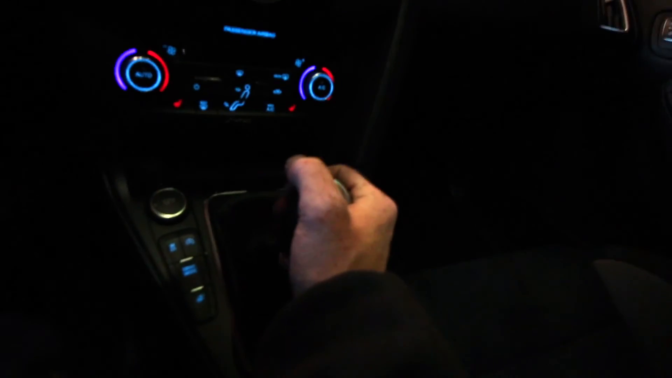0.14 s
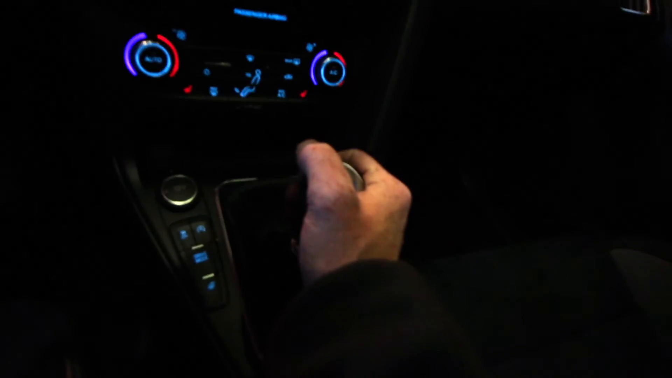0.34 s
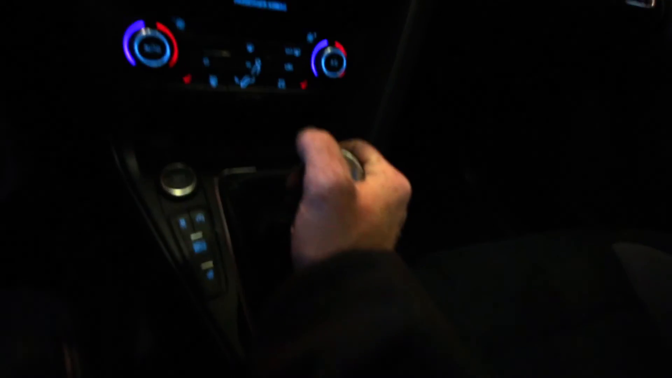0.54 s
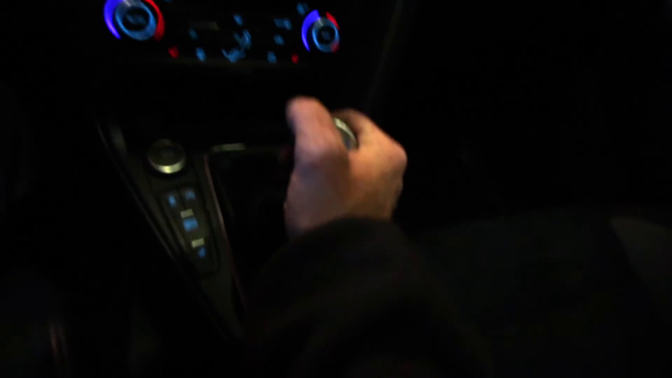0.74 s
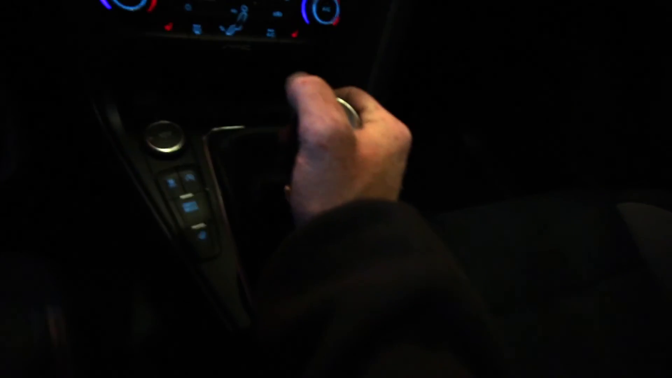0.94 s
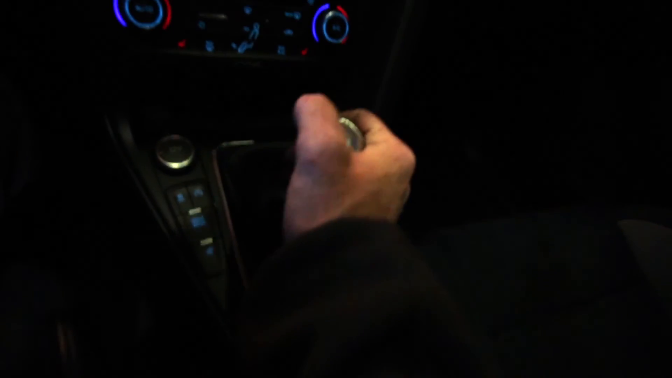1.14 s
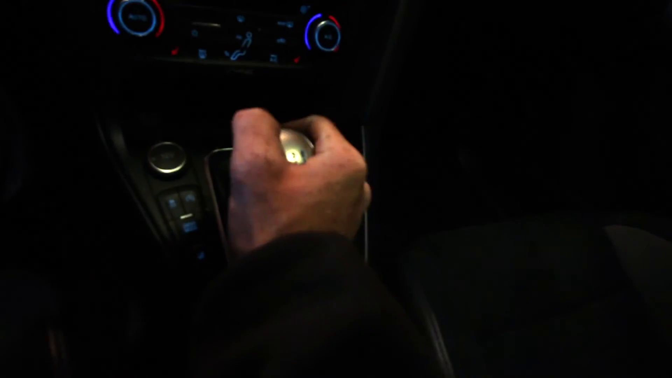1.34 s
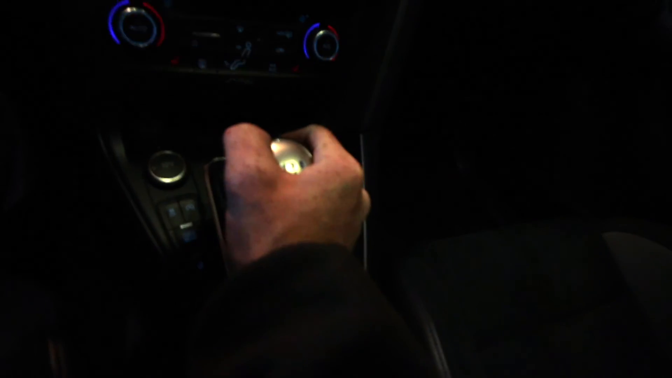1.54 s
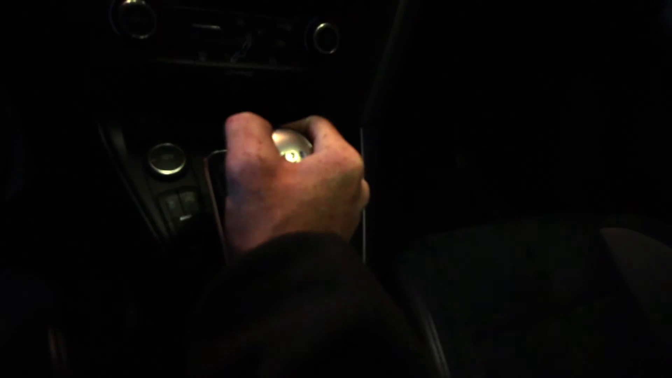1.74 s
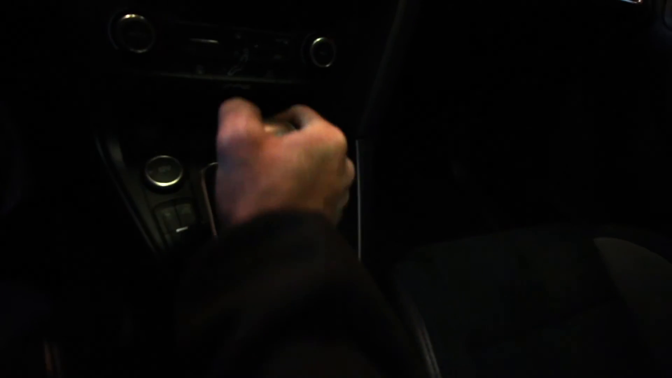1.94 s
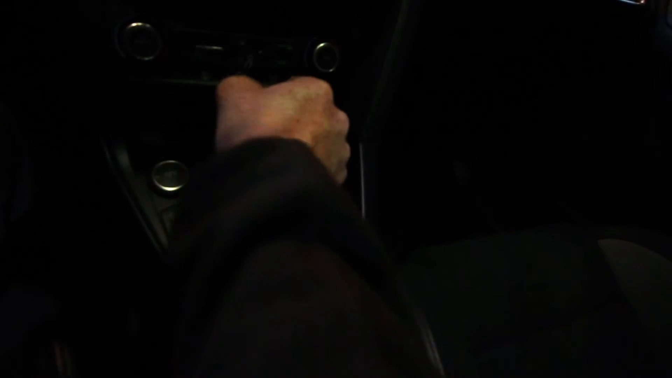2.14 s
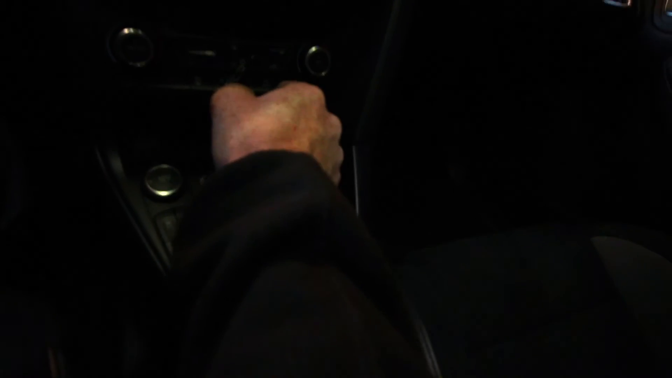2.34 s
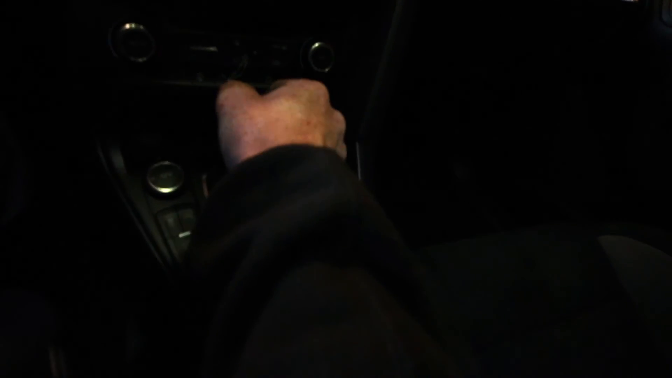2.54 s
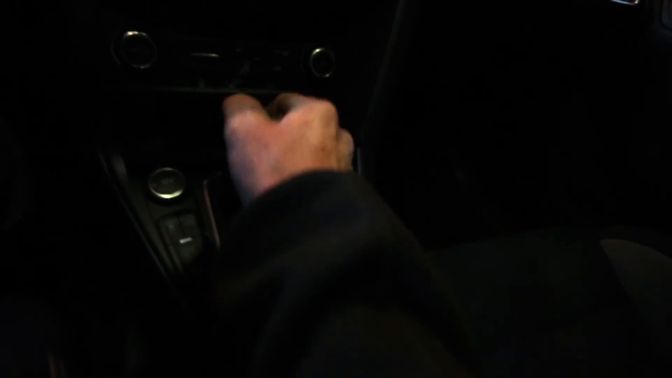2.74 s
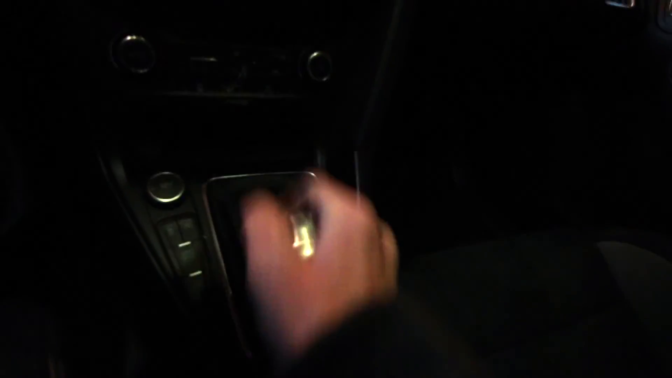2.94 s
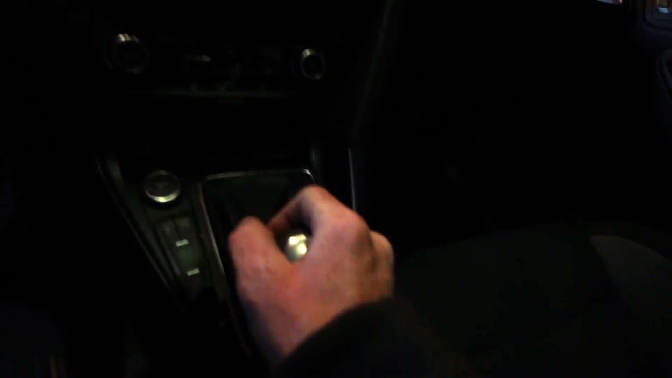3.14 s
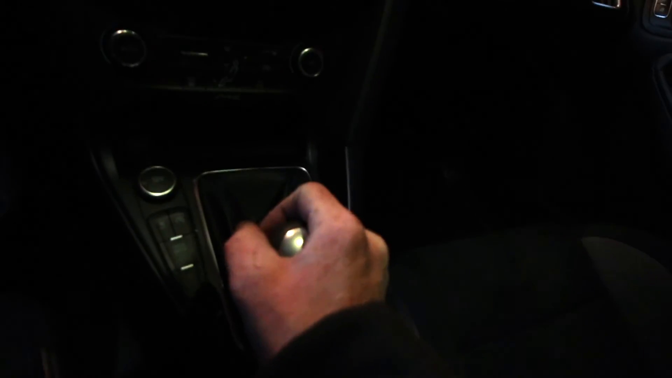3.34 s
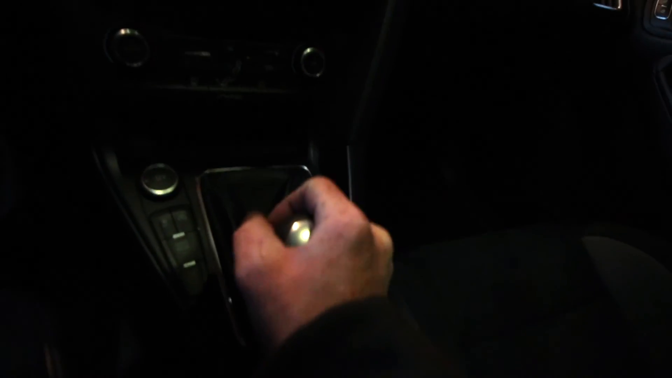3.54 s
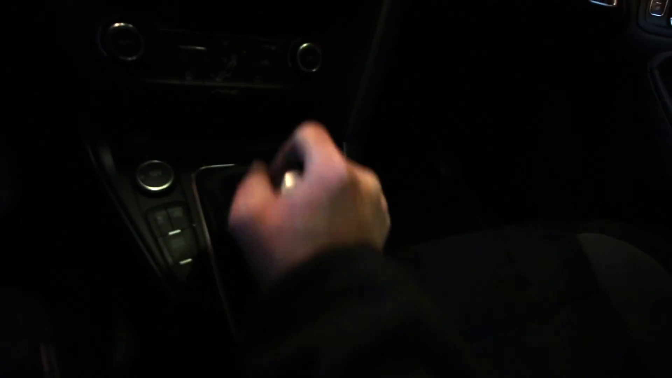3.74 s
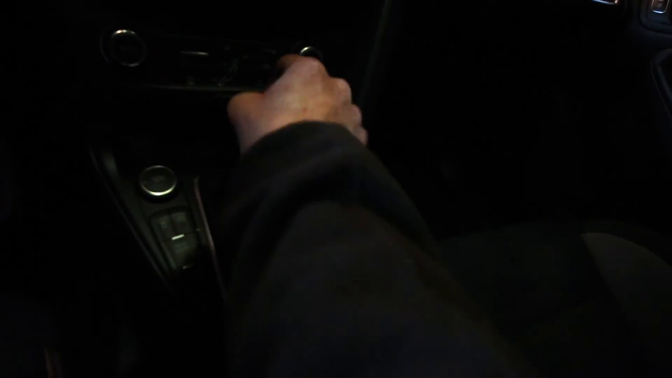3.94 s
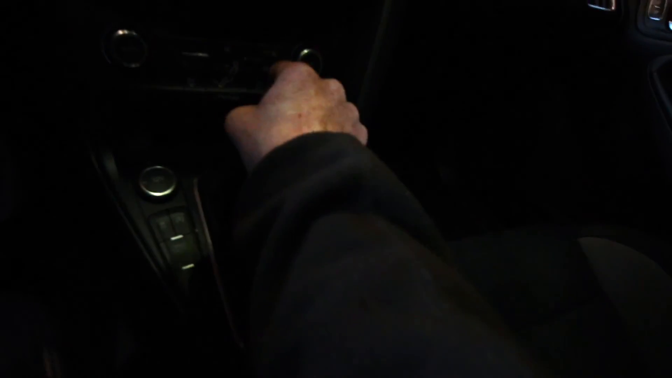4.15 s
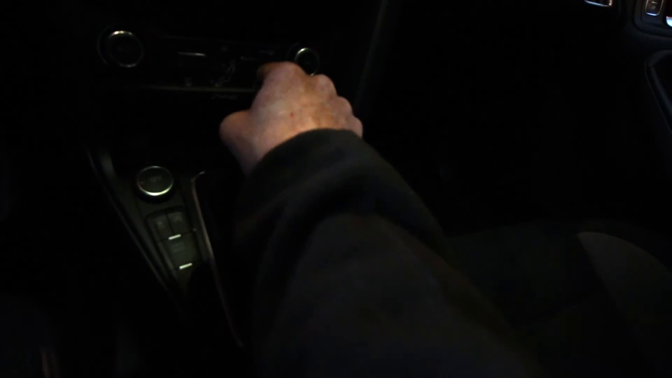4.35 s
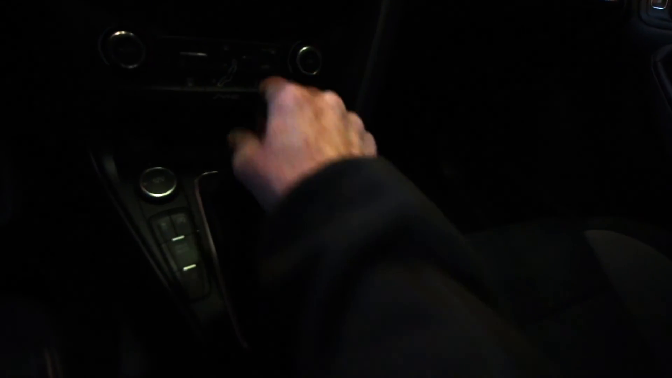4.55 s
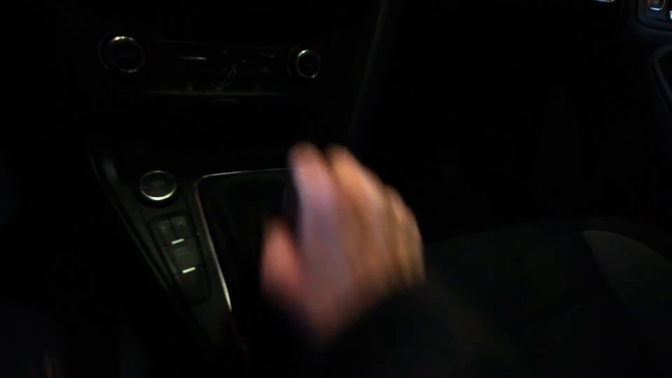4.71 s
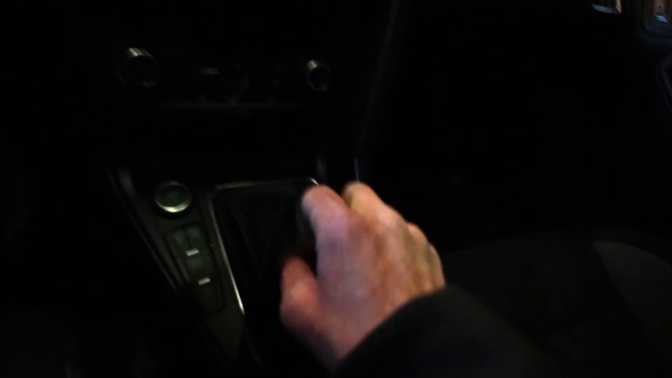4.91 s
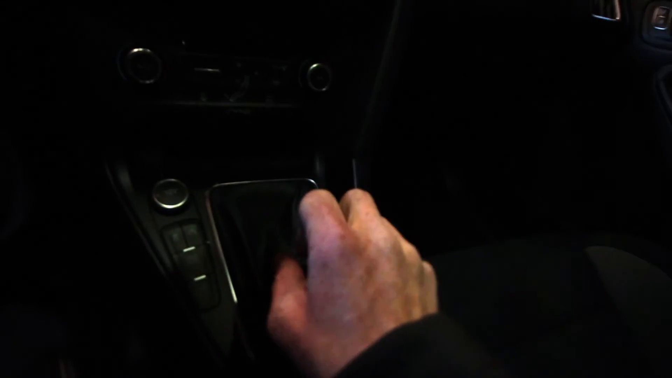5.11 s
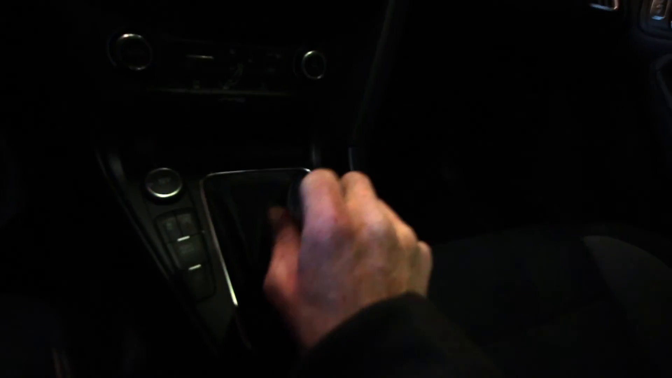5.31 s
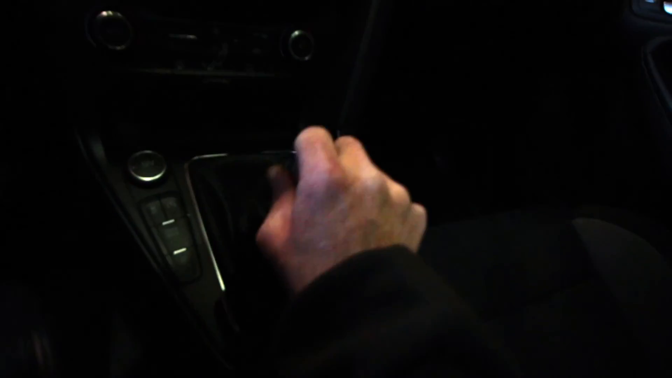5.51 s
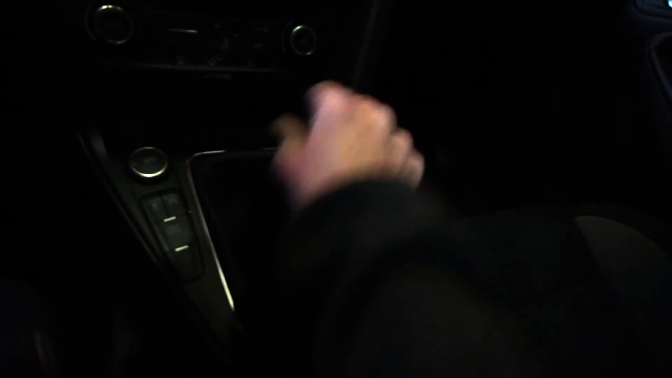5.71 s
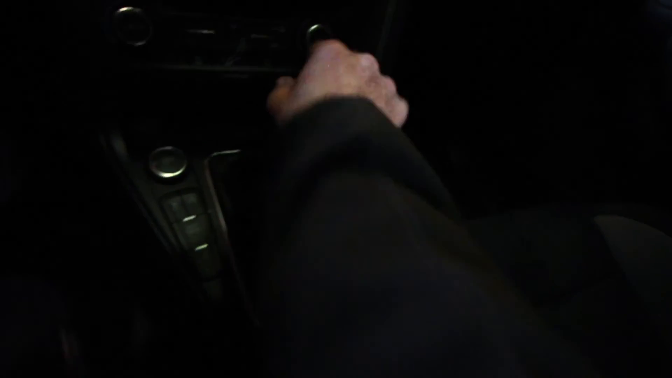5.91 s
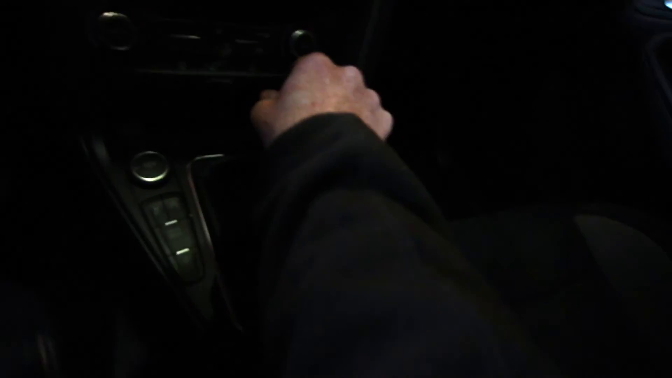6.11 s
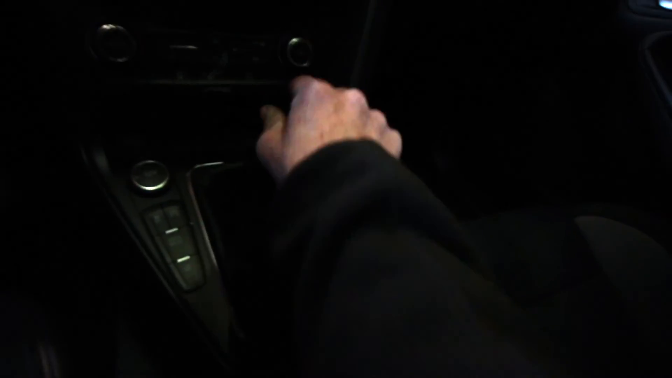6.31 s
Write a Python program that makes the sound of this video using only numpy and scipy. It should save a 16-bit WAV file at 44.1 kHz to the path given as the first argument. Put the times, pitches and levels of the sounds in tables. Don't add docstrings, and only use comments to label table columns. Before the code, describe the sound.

Close inside a parked car, a manual shifter rattles in neutral, then clunks firmly five times, with metallic ticks and cloth rubbing over faint fan hum.

```python
import sys
import numpy as np
from scipy import signal
from scipy.fft import rfft, irfft, next_fast_len
from scipy.io import wavfile
from scipy.ndimage import uniform_filter1d, map_coordinates

SR = 44100
rng = np.random.default_rng(int(sys.argv[2]) if len(sys.argv) > 2 else 0)


def put_to_file(sound):
    columns = np.atleast_2d(sound).T
    safe = np.clip(columns, -1, 1)
    whole_steps = np.round(safe * 32767)
    wavfile.write(sys.argv[1], SR, whole_steps.astype(np.int16))


def voltage_ratio(level):
    return 10 ** (np.asarray(level, float) / 20)


N = 280961

# f/Hz, level/dB, share of the decay time
HOUSING_MODES = [(465.7, 7.5, 0.58), (590, -5, 1), (650, -1.5, 1.3), (850, -6.5, 0.85)]
PLATE_MODES = [(910, 6.5, 0.43), (1022, 6, 0.66), (1164, -2, 1), (1360, 6.5, 0.41), (1800, -3.5, 0.63),
               (2000, -7, 1)]
DETENT_MODES = [(2240, -7.5, 0.5), (2756, -6, 0.49), (3500, -14, 0.15), (3760, -9, 0.45),
                (4400, 3.5, 0.078)]

# f/Hz, level/dB (per Hz)
SLEEVE_COLOUR = [(250, -35), (450, 1), (1000, -3.5), (1280, 0.5), (1600, -3.5), (2200, -7.5), (2600, -4.5),
                 (2950, -5.5), (3450, -5), (3950, -11), (4500, -14), (7500, -25), (15600, -37)]
RUMBLE_COLOUR = [(12, -47), (28, 18.5), (45, 6.5), (70, 15.5), (110, -41)]
SHUDDER_COLOUR = [(50, -26), (90, 5), (130, 3), (200, -2), (270, -5.5), (450, -16), (800, -50)]
AIR_COLOUR = [(150, -42), (250, 0), (400, -10), (900, -12), (1210, -14), (1500, -16.5), (1830, -16),
              (2100, -20), (5000, -26.5), (15700, -29)]
DULL_FOLD_COLOUR = [(1500, 0), (3500, -2), (6500, -6), (9000, -6.5), (12500, -32)]
BRIGHT_FOLD_COLOUR = [(7500, -39), (9500, 0), (11500, 0), (15700, -7.5)]
CUFF_COLOUR = [(1800, -30), (2600, -8), (3250, 0), (3800, -3), (4200, -15), (6000, -16), (8000, -36)]

# f/Hz, t60/s (time to fade 60 dB)
ECHO_FADE = [(100, 0.42), (600, 0.14), (4000, 0.042)]
# t/s of fastest motion, level/dB of rustle, rise/s and fall/s (20 dB each)
ARM_STROKES = [(0.02, -54, 4, .25), (.48, -52, 0.53, .5), (.78, -56, 0.1, 0.7), (1.5, -63, 0.14, 0.03),
               (1.95, -61.5, 0.2, 0.3), (2.11, -42, 0.085, .17), (2.55, -67.5, 0.3, 0),
               (2.83, -61.5, 0.1, 0.3), (2.961, -47.5, .07, 0.05), (3.055, -40.5, 0.08, .18),
               (3.73, -55, .22, 0.33), (3.901, -46, 0.06, 0.14), (3.979, -44, 0.0546, .19),
               (4.62, -57.5, 0.16, 0.14), (4.751, -47, .06, 0.06), (4.83, -43.5, .08, 0.16),
               (5.48, -55, 0.29, 0.2), (5.77, -47, 0.27, .2), (5.94, -50, 0.18, 0.16),
               (6.35, -59, 0.1, 0.5)]
# t/s, level/dB
GRIP_PRESSURE = [(0, 5), (.5, -1.5), (.9, 0), (1.3, 5.5), (1.6, 0), (1.85, 11.5), (2, 3.5), (2.25, 3.5),
                 (2.7, 0), (3.4, 2.5), (3.55, 0.5), (3.8, 8.5), (4.15, 4.5), (4.45, -0.5), (4.66, 5),
                 (5.3, -4.5), (5.7, 2), (6.37, 1)]
# t/s, turns per second/Hz
FAN_SPEED = [(0, 40.8), (1.65, 40.92), (2.5, 41.0), (3.4, 41.02), (4.35, 41.08), (5.2, 41.08),
             (6.37, 41.12)]
# multiple of its speed, level/dB (rms)
FAN_TONES = [(10, -77), (11, -78), (14, -72), (15, -80), (18, -81), (19, -75), (21, -80), (22, -75),
             (23, -78), (24, -81), (26, -82), (29, -77), (30, -80), (31, -77), (33, -77), (34, -81),
             (35, -78), (43, -86), (44, -80), (45, -79), (46, -81), (62, -89), (64, -86), (65, -88),
             (66, -86)]
# t/s, peak level/dB, f/Hz
LEVER_JIGGLES = [(.081, -17.5, 202), (.153, -31, 168), (0.194, -19.5, 170), (0.254, -17.5, 264),
                 (.287, -22.5, 190), (.332, -19, 182), (0.361, -22.5, 178), (.392, -22, 184),
                 (1.09, -19.5, 92), (1.1495, -20.5, 290), (1.289, -22.5, 260), (1.396, -20, 345),
                 (1.403, -15.5, 126), (2.488, -24, 94), (2.79, -21.5, 102), (2.858, -24.5, 172),
                 (1.43, -27, 140), (1.268, -26, 300), (4.655, -26, 150), (1.201, -30, 220)]
# t/s, peak level/dB, f/Hz, t60/s
FLOOR_BOOMS = [(2.026, -22.5, 128.8, 0.32), (2.053, -18.5, 157, 0.11), (2.103, -3.5, 139, 0.02),
               (2.127, -15, 156, 0.039), (2.204, -22, 100, 0.087), (2.808, -22.5, 142, 0.089),
               (2.936, -19, 126, 0.11), (2.958, -10.5, 147, 0.04), (3.044, -8, 173, 0.055),
               (3.055, -9, 120, .042), (3.705, -26, 126, 0.089), (3.864, -5.5, 132, 0.029),
               (3.899, -10.5, 157, 0.071), (3.914, -6.5, 136, .063), (3.947, -11.5, 132, 0.057),
               (3.968, -10, 134, 0.037), (4.004, -14, 102, 0.1), (4.06, -25, 140, 0.17),
               (4.596, -19.5, 130, 0.042), (4.755, -7.5, 180, 0.039), (4.8, -9, 143, 0.066),
               (4.822, -12.5, 188, 0.062), (4.838, -10.5, 187, 0.032), (5.465, -16, 155, 0.023),
               (5.488, -22.5, 127.3, 0.18), (5.769, -12, 121, 0.19), (5.807, -4, 160, 0.105),
               (5.88, -21, 115, 0.31), (5.909, -11.5, 177, 0.084), (5.952, -20, 70.7, 0.2)]
# t/s, peak level/dB, f/Hz, t60/s
CONSOLE_BOOMS = [(2.018, -21, 225, 0.051), (2.06, -12.5, 233, 0.061), (2.079, -10, 265, 0.075),
                 (2.108, -13.5, 360, 0.039), (2.111, -19, 257, .12), (2.762, -26, 273, .1),
                 (2.933, -13.5, 280, .032), (2.959, -22.5, 267, 0.19), (3.014, -14, 273.4, 0.072),
                 (3.053, -9.5, 275, 0.03), (3.704, -19.5, 248, 0.026), (3.835, -27, 290, .07),
                 (3.884, -11, 250, .045), (3.888, -14, 340, .025), (3.974, -15.5, 353, 0.059),
                 (3.99, -9, 252, 0.031), (4.557, -27, 277, 0.09), (4.737, -13, 267, 0.035),
                 (4.757, -11, 260, 0.064), (4.783, -16, 259, 0.06), (4.802, -12.5, 308, 0.08),
                 (5.486, -16.5, 249, 0.045), (5.769, -5, 244, 0.029), (5.797, -6.5, 248.3, 0.08),
                 (5.797, -2, 177, 0.045), (5.894, -9, 320, .038), (6.35, -26.5, 297, 0.078),
                 (4.568, -28, 260, .05), (5.922, -20, 250, .07), (2.798, -27, 190, .08),
                 (3.034, -17, 280, .04), (4.772, -22, 260, .1)]
# t/s, housing level/dB, f/Hz of the part hit, crispness/dB
LEVER_SLAMS = [(2.074, -24, 590, -8), (2.088, -25.5, 1684, -0.5), (2.099, -18, 630, -5),
               (2.117, -20.5, 666, -22), (2.132, -25, 684, -13), (2.951, -25, 827, -10),
               (2.959, -23, 690, -8), (2.973, -27, 537, -12), (3.024, -23.5, 947, -0.5),
               (3.040, -23.5, 650, -4), (3.0575, -26, 680, 6), (3.865, -31.5, 555, -17),
               (3.895, -26, 1730, -4), (3.904, -27.5, 683, -13), (3.916, -24, 667, -7),
               (3.964, -17.5, 630, -3.5), (3.98, -20.5, 633, -16), (3.996, -28, 670, -17),
               (4.742, -24.5, 910, -10), (4.757, -23, 490, -5.5), (4.801, -22, 526, -16),
               (4.827, -25, 1840, -5), (4.836, -29, 677, -20), (5.755, -32, 1030, 0.5),
               (5.771, -20.5, 630, -29), (5.785, -22.5, 650, -12), (5.796, -20, 513, -7),
               (5.896, -25.5, 465, -6), (5.909, -26.5, 700, -9), (5.916, -27, 467, -8.5)]
# t/s, housing level/dB, f/Hz of the part hit
LEVER_TAPS = [(0.083, -37.5, 510), (1.218, -33.5, 1150), (1.228, -36, 1030), (1.282, -36.5, 506),
              (1.327, -45, 590), (3.872, -36, 1000), (2.752, -41, 1150), (3.705, -36, 695),
              (4.655, -43, 2000), (1.831, -37, 1000), (2.028, -41, 466), (2.76, -39, 427),
              (3.474, -43.5, 966), (3.691, -37.5, 580), (3.717, -34.5, 665), (3.878, -36, 1820),
              (4.545, -37, 600), (4.818, -22.5, 673), (5.925, -34, 690), (6.342, -38, 1000),
              (2.81, -45, 1200), (4.555, -42, 1000), (2.84, -44, 800), (3.93, -33, 900)]
# t/s, peak level/dB, f/Hz, t60/s
METAL_TICKS = [(1.2275, -44, 3000, .012), (1.234, -46, 3300, .01), (1.2785, -42, 2100, .01),
               (1.28, -46, 3700, .01), (1.327, -36, 900, .004), (2.052, -41, 1600, .02),
               (2.0755, -22, 1500, .005), (2.087, -32, 4800, .01), (2.9288, -40, 1800, .008),
               (2.9505, -31, 3500, .004), (2.9645, -28, 2500, .01), (3.0235, -26, 2400, .005),
               (3.039, -31, 3400, .015), (3.057, -23, 4000, .003), (3.8667, -34, 1400, .008),
               (3.9085, -35, 2700, .008), (3.952, -31, 1300, .01), (3.9625, -27, 2000, .008),
               (3.98, -29, 1400, .01), (4.682, -43, 2050, .015), (4.7155, -40, 1800, .008),
               (4.7495, -27, 2000, .012), (4.7585, -26, 3000, .003), (4.79, -34, 1700, .012),
               (4.801, -33, 2700, .012), (4.82, -30, 2000, .006), (5.755, -21, 1700, .004),
               (5.783, -33, 3800, .006), (5.7965, -27, 3300, .005), (5.852, -38, 2200, .008),
               (5.898, -33, 1600, .008), (5.921, -33, 3000, .005), (1.3948, -21, 590, .03),
               (1.404, -38, 2100, .012), (1.3975, -31, 1020, .025), (1.4, -28, 450, .03),
               (1.3945, -36, 4200, .005), (1.2195, -36, 1100, .012), (1.8315, -35, 1000, .012),
               (3.4745, -42, 1000, .01), (3.6915, -36, 800, .01), (5.0808, -41, 500, .02),
               (5.4165, -36, 1100, .008), (.085, -36, 470, .04), (2.7555, -37, 800, .015),
               (4.547, -36, 1300, .008), (1.2825, -35, 520, .025), (2.9595, -24, 800, .02)]
# t/s, peak level/dB, low f/Hz, middle f/Hz, high f/Hz
CLIP_SNAPS = [
    (0.2577, -25.5, 473, 960, 1510),
    (0.4305, -33, 600, 1210, 1650),
    (1.1483, -18.5, 480, 910, 1480),
    (1.3944, -24.5, 586, 1330, 2210),
    (1.4, -34, 560, 1080, 1880),
    (5.0808, -37.5, 480, 1330, 2400),
    (5.4164, -32, 343, 555, 1500),
]
# t/s, hiss level/dB, half length/s, brightness/dB
GAITER_FOLDS = [(0.505, -65, 0.16, -12), (1.293, -62.5, 0.033, -4), (1.435, -60, 0.0048, -2),
                (1.495, -61.5, 0.02, -4), (1.861, -62, 0.017, -2), (1.982, -57, 0.029, -1.5),
                (2.09, -51.5, 0.0074, -11), (2.145, -52, 0.014, -2), (2.823, -59, 0.011, -3),
                (2.968, -51, 0.028, -3), (3.022, -44, 0.0061, -6), (3.048, -46, 0.007, -2),
                (3.331, -64, 0.0086, 9), (3.434, -64.5, 0.01, 1), (3.7, -62, 0.016, -5),
                (3.77, -60, 0.046, -6), (3.874, -53.5, 0.016, -1), (3.99, -55.5, 0.0077, 5),
                (4.616, -55, 0.014, -1.5), (4.743, -51, 0.019, -3.5), (4.814, -52, 0.021, -3),
                (4.827, -44, 0.0044, 1), (5.154, -67, 0.032, -7), (5.374, -66, 0.054, -6),
                (5.494, -62, 0.015, -6), (5.766, -51.5, 0.031, -4), (5.89, -52.5, 0.017, 1),
                (5.921, -53, 0.0095, -7), (6.05, -60.5, 0.01, -6), (6.325, -64, 0.03, -10)]
# t/s of the peak, level/dB, rise/s and fall/s (20 dB each)
CUFF_DRAGS = [
    (.5, -56, .3, .3),
    (2.15, -52, .04, .2),
    (3.07, -50, .06, .25),
    (4.0, -50, .06, .3),
    (4.87, -49.5, .06, .25),
    (5.5, -62, .2, .3),
    (5.94, -56, .15, .2),
]
# t/s, peak level/dB, f/Hz
CAR_LURCHES = [
    (2.11, -23.5, 48),
    (3.045, -27, 45),
    (3.97, -25, 50),
    (4.85, -26, 42.2),
    (5.95, -32, 45),
]

STILL_DB = -76
SCRAPE_DB, SCRAPE_FOLLOWS, SCRAPE_LEADS_S = -62, 0.45, 0.06
RUMBLE_DB, RUMBLE_FOLLOWS = -52, 0.15
SHUDDER_DB, SHUDDER_FOLLOWS = -55, 0.3
JOLT_DB, JOLT_T60_S = -27.5, 0.54
JIGGLE_T60_S = 0.039
RATTLE_DB = 1.76
TAP_CRISP_DB, PLATE_DB, TICK_DB = -8.5, 3, -7
KNOCK_T60_S = 0.028
AIR_DB, SNAP_ECHO_DB = -60.3, -17


def unit(x):
    return x / np.sqrt(np.mean(x ** 2) + 1e-20)


def along(points, hz):
    f, v = np.transpose(points)
    return np.interp(np.log(hz + 1), np.log(f + 1), v)


def curve(rows):
    s, value = np.transpose(rows)
    return np.interp(np.arange(N) / SR, s, value)


def coarse_times():
    return np.arange(N)[::32] / SR


def every_sample(slow):
    return np.interp(np.arange(N) / SR, coarse_times(), slow)


def wobble(rate):
    knots = rng.standard_normal(int(N * rate / SR) + 4)
    return map_coordinates(knots, [np.arange(N) * rate / SR])


def noise(colour, patchy_db):
    _, _, z = signal.stft(rng.standard_normal(N), SR, nperseg=512)
    patches = uniform_filter1d(rng.standard_normal(z.shape), size=6, axis=0)
    patches = uniform_filter1d(patches, size=8, axis=1)
    patchy = signal.istft(z * voltage_ratio(patchy_db * unit(patches)), SR, nperseg=512)[1]
    m = next_fast_len(N + 8192)
    gain = voltage_ratio(along(colour, np.fft.rfftfreq(m, 1 / SR)))
    return unit(irfft(rfft(patchy, m) * gain, m)[:N])


def ring(t, hz, t60, attack):
    return np.sin(2 * np.pi * hz * t) * voltage_ratio(-60 * t / t60) * (1 - np.exp(-t / attack))


def add(track, s, sound):
    track[round(s * SR):][:len(sound)] += sound


def struck(t, parts_db, t60, chance):
    modes = np.array(HOUSING_MODES + PLATE_MODES + DETENT_MODES)
    size, detune, side = chance
    part_db = np.repeat(parts_db, [len(HOUSING_MODES), len(PLATE_MODES), len(DETENT_MODES)])
    level_db = part_db + modes[:, 1] + 1.16 * size
    hz = modes[:, 0] * (1 + 0.028 * detune)
    rings = ring(t, hz[:, None], t60 * modes[:, 2:], attack=0.0013)
    return (np.sign(side) * voltage_ratio(level_db)) @ rings


def moving(lead_s):
    s, db, rise, fall = np.transpose(ARM_STROKES)[:, :, None]
    since = coarse_times() + lead_s - s
    away = np.where(since < 0, -since / rise, since / fall)
    stroke_db = db - STILL_DB - 20 * away ** 1.31
    power = voltage_ratio(2 * stroke_db).sum(axis=0)
    return every_sample(10 * np.log10(1 + power))


def arm():
    sleeve_db = STILL_DB + moving(0)
    scrape_db = SCRAPE_DB + SCRAPE_FOLLOWS * moving(SCRAPE_LEADS_S)
    slips = voltage_ratio(0.95 * wobble(40) + 1.8 * wobble(400))
    sleeve = voltage_ratio(sleeve_db + 4.0) * unit(slips * noise(SLEEVE_COLOUR, patchy_db=-1.5))

    hits = rng.random(N) < 350 / SR
    grains = hits * rng.standard_normal(N) * voltage_ratio(4.1 * wobble(60))
    t = np.arange(SR // 16) / SR
    chance = rng.standard_normal((3, len(HOUSING_MODES + PLATE_MODES + DETENT_MODES)))
    gate = struck(t, [-0.5, -10, -22], 0.11, chance)
    scrape = unit(signal.fftconvolve(grains, gate)[:N])
    return sleeve + voltage_ratio(scrape_db - 8.5) * scrape


def body():
    t = coarse_times()
    jolts = 0
    for s, db, *_ in FLOOR_BOOMS:
        jolts = jolts + voltage_ratio(2 * (db + JOLT_DB - 60 * (t - s) / JOLT_T60_S)) * (t > s)
    hand_db = SHUDDER_DB + curve(GRIP_PRESSURE) + SHUDDER_FOLLOWS * moving(0)
    shaking = np.sqrt(voltage_ratio(2 * hand_db) + every_sample(jolts))
    shudder = shaking * unit(voltage_ratio(2.1 * wobble(25)) * noise(SHUDDER_COLOUR, patchy_db=2.0))

    rumble_db = RUMBLE_DB + RUMBLE_FOLLOWS * moving(-0.078)
    rumble = unit(voltage_ratio(0.36 * wobble(27)) * noise(RUMBLE_COLOUR, patchy_db=-0.3))
    return voltage_ratio(rumble_db) * rumble + shudder


def fan():
    turns = np.cumsum(curve(FAN_SPEED)) / SR
    buzz = np.zeros(N)
    for multiple, db in FAN_TONES:
        buzz += np.sqrt(2) * voltage_ratio(db) * np.sin(2 * np.pi * (multiple * turns + rng.random()))
    return buzz


def still_air():
    return voltage_ratio(AIR_DB) * noise(AIR_COLOUR, patchy_db=0.4)


def thuds():
    out, t = np.zeros(N + SR), np.arange(SR // 4) / SR
    sagging = t * (1 + 0.1 * np.exp(-t / 0.0092))
    jiggles = [(*jiggle, JIGGLE_T60_S) for jiggle in LEVER_JIGGLES]
    for s, db, hz, t60 in FLOOR_BOOMS + CONSOLE_BOOMS + jiggles:
        side = rng.choice([-1, 1])
        add(out, s, side * voltage_ratio(db - 2.1) * ring(sagging, hz, t60, attack=0.0024))
    return out[:N] * voltage_ratio(RATTLE_DB * wobble(120))


def contacts():
    taps = [(*tap, TAP_CRISP_DB) for tap in LEVER_TAPS]
    return [(s, db, crisp_db + PLATE_DB, crisp_db + TICK_DB, hz)
            for s, db, hz, crisp_db in LEVER_SLAMS + taps]


def knocks():
    out, t = np.zeros(N + SR), np.arange(SR // 14) / SR
    t60 = KNOCK_T60_S
    mode_count = len(HOUSING_MODES + PLATE_MODES + DETENT_MODES)
    for s, db, plate_db, tick_db, hz in contacts():
        blow, rebound = rng.standard_normal((2, 3, mode_count))
        parts_db = db + np.array([-3, plate_db - 5, tick_db + 7.5])
        landed_db = parts_db[int(hz > 850)] + 4
        landed = voltage_ratio(landed_db - 0.5) * ring(t, hz, 1.56 * t60, attack=0.0012)
        crack = voltage_ratio(parts_db[2] + 12.5) * ring(t, 1900, 0.0028, attack=0.00063)
        add(out, s, struck(t, parts_db, t60, blow) + landed + crack)
        add(out, s - t60 / 6, struck(t, parts_db - 7, t60, rebound[:, ::-1]))
        later = t60 * (0.25 + 0.0822 * abs(rebound[0, 0]))
        add(out, s + later, struck(t, parts_db - 8.5, t60, rebound))
    return out[:N]


def ticks():
    out, t = np.zeros(N + SR), np.arange(SR // 30) / SR
    for s, db, hz, t60 in METAL_TICKS:
        add(out, s, voltage_ratio(db + 3) * ring(t, hz, t60, attack=0.0002))
    return out[:N]


def snaps():
    out, t = np.zeros(N + SR), np.arange(SR // 20) / SR
    dry_noise = noise(SLEEVE_COLOUR, patchy_db=-0.6)
    for s, db, *hz in CLIP_SNAPS:
        hz = np.array(hz + [1.524 * hz[-1]])[:, None]
        burst = voltage_ratio(db - 14 - 60 * t / 0.029) * (1 - np.exp(-t / 0.00091))
        crack = burst * dry_noise[round(s * SR):][:len(t)]
        t60 = 0.009 * (900 / hz) ** 0.45
        tones = voltage_ratio(db + np.array([6.5, 6.5, 7, 3])) @ ring(t, hz, t60, attack=0.00098)
        add(out, s, crack - tones)
    return signal.sosfilt(signal.butter(4, 3900, fs=SR, output="sos"), out[:N])


def gaiter():
    s, db, half, bright_db = np.transpose(GAITER_FOLDS)[:, :, None]
    bells = np.exp(-((coarse_times() - s) / half) ** 2 / 4)

    def swell(level_db):
        return every_sample(np.sqrt(np.sum((voltage_ratio(level_db) * bells) ** 2, axis=0)))

    dull = swell(db - 0.5 - bright_db / 2) * noise(DULL_FOLD_COLOUR, patchy_db=-2.0)
    bright = swell(db - 3.5 + bright_db / 2) * noise(BRIGHT_FOLD_COLOUR, patchy_db=0.5)
    return (dull + bright) * voltage_ratio(1.7 * wobble(300))


def cuff():
    s, db, rise, fall = np.transpose(CUFF_DRAGS)[:, :, None]
    t = coarse_times()
    away = np.where(t < s, (s - t) / rise, (t - s) / fall)
    level = voltage_ratio(db - 20 * away).sum(axis=0)
    return every_sample(level) * unit(voltage_ratio(1.5 * wobble(300)) * noise(CUFF_COLOUR, patchy_db=1.5))


def lurches():
    out, t = np.zeros(N + SR), np.arange(SR // 2) / SR
    for s, db, hz in CAR_LURCHES:
        add(out, s, voltage_ratio(db + 2.5) * ring(t, hz, t60=0.28, attack=0.019))
    return out[:N]


def cabin_echo(x):
    hz, t, z = signal.stft(rng.standard_normal(SR // 3), SR, nperseg=256)
    fading = z * voltage_ratio(-60 * t / along(ECHO_FADE, hz)[:, None])
    tail = signal.istft(fading, SR, nperseg=256)[1]
    return signal.fftconvolve(x, tail / np.linalg.norm(tail))[:N]


def scene():
    steady = arm() + body() + fan() + still_air()
    low, hard = thuds(), knocks()
    sharp = ticks() + snaps()
    echo = cabin_echo(voltage_ratio(-15) * low + voltage_ratio(-14) * hard + voltage_ratio(SNAP_ECHO_DB) * sharp)
    return (steady + low + hard + sharp + echo + gaiter() + cuff() + lurches())[None]


def top_cut(x):
    return signal.sosfilt(signal.butter(12, 15770, fs=SR, output="sos"), x)


def record(dry):
    bass_cut = signal.sosfilt(signal.butter(3, 31, "highpass", fs=SR, output="sos"), dry)
    rounded = bass_cut / (1 + abs(bass_cut / 0.42) ** 4) ** (1 / 4)
    m = next_fast_len(N)
    heard = np.fft.rfftfreq(m, 1 / SR) < 15800
    return top_cut(irfft(rfft(rounded, m) * heard, m)[:, :N])


dry = scene()
out = record(dry)
put_to_file(out)
```